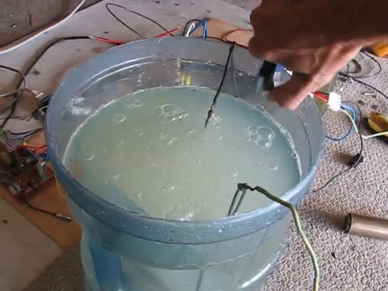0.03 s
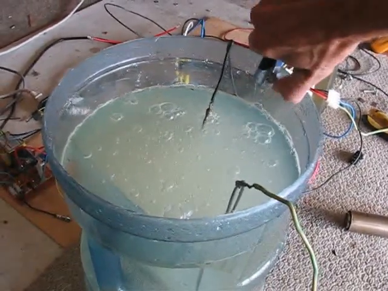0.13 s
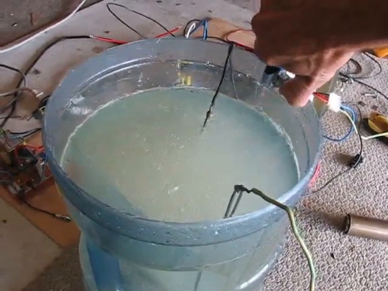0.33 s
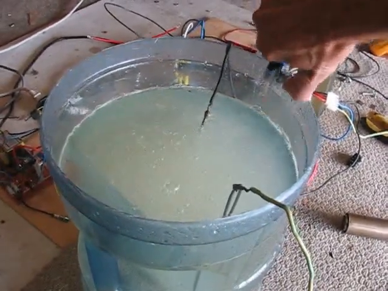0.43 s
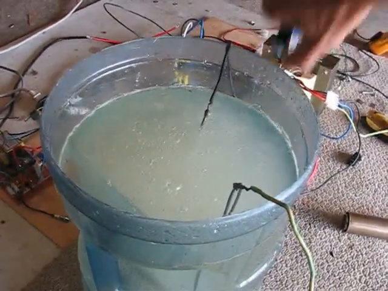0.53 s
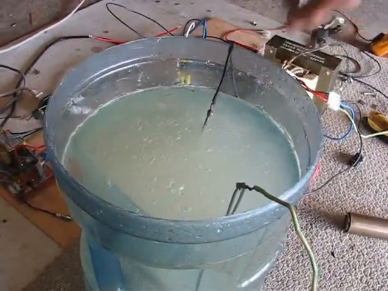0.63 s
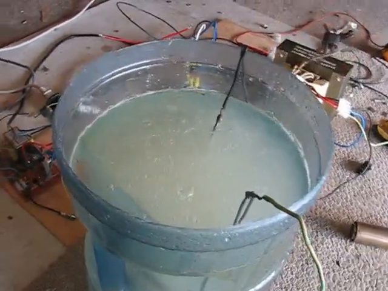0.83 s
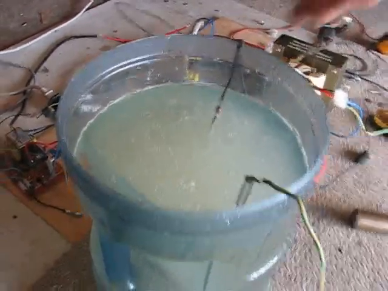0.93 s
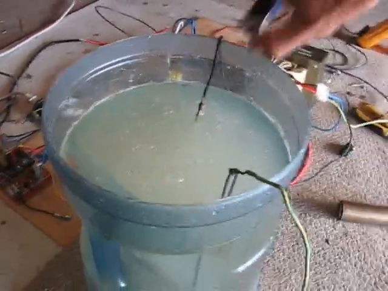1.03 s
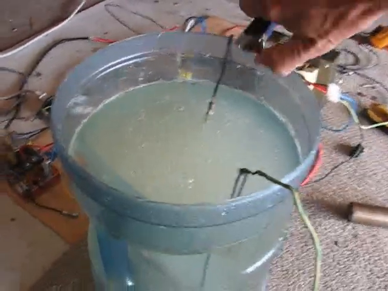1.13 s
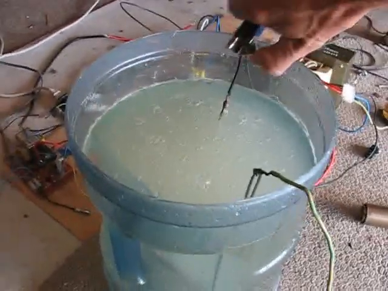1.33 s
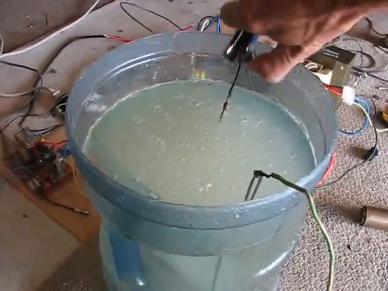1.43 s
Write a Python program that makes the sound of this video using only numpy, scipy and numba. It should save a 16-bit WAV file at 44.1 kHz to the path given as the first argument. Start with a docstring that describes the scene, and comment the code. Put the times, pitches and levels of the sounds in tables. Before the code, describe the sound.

Gas bubbles explode with a loud bang over a fizzing bucket, between sharp igniter clicks.

```python
"""Water fizzes in a bucket over a low hum, and a hand-held spark igniter clicks above it.
One gas bubble cracks, then the whole raft of bubbles explodes with a bang that sets the air in the
bucket ringing and fills the room. Two more clicks follow as tiny bubbles keep bursting.
The recorder turns itself down at every loud sound and creeps back up."""
import sys
import numpy as np
from scipy import signal
from scipy.fft import rfft, irfft
from scipy.io import wavfile
from numba import njit

SR = 44100
rng = np.random.default_rng(int(sys.argv[2]) if len(sys.argv) > 2 else 0)


def to_wav(s):
    """Save 16-bit WAV."""
    ch = np.atleast_2d(s).T  # columns
    pcm = np.round(np.clip(ch, -1, 1) * 32767)  # PCM
    wavfile.write(sys.argv[1], SR, pcm.astype(np.int16))


N = 66150
T = np.arange(N) / SR

# Levels are relative. Pan above 0 is to the left. Likeness 1 means left and right are the same.
# the raft's chain of explosions: t/s, level/dB, length of the push/s, pan/dB
BLASTS = [(.3210, -2, 0.00049, 18), (0.3237, -10, .0004, -28.5), (0.3237, -21, 0.00026, 13),
          (0.3262, -9.5, .0005, -23), (0.3308, -3.5, 0.00015, -4), (.3340, -2, 0.00026, -10),
          (0.339, -2, 0.0005, -3)]
# tones of the air in the bucket: f/Hz, level/dB, fade/s (a fade is the time to drop 60 dB)
BUCKET_TONES = [(435.6, -4, 0.43), (508, 5.5, 0.33), (608, -19, 0.25), (960, -4.5, 0.56), (980, 4, 0.44),
                (1056, -5, 0.38), (1067, -2.5, 0.47), (1148, -12, 0.27), (1290, -1, 0.32), (1507, -1, 0.41),
                (1581, -0.5, 0.46), (1897, -4, 0.45), (2358, -16.5, 0.75), (2885, -3.5, 0.48)]
# noise of the bang: f/Hz, level/dB
BANG_COLOUR = [(40, -32), (150, -8), (300, 0), (370, -2), (470, 1.5), (700, 3), (1000, 2), (1600, 1.5),
               (2300, -1), (2850, -1.5), (3600, -6), (4500, -15.5), (6000, -6), (9000, -19)]
# tones of the first bubble's crack: f/Hz, level/dB, fade/s
CRACK_TONES = [(1567, -12, .008), (2331, -12, .01), (3000, -9, .011), (3472, -2, .018), (4005, 0, .02),
               (4511, -6, .015), (6200, -9, .012), (7500, -9, .011), (8600, -10, .008)]
# echo of the crack: f/Hz, level/dB
CRACK_ECHO_COLOUR = [(100, -15), (300, -7.5), (600, -5.5), (2000, -4), (3600, 4.5), (5000, -11.5),
                     (6300, 0), (9000, -5)]
# igniter clicks: t/s, level/dB, length/s, brightness/(dB per octave), pan/dB, echo/dB
CLICKS = [(0.214, 13, .0016, 10, -6, -6), (0.2586, -2, .0003, 0, 1, -12), (0.5937, -3, .0015, 34.5, -6, -4),
          (1.2123, 7, .0011, 17.5, 18, -2)]
# hammer hits within a click: delay/click length, level/dB
HAMMER_HITS = [(0, -13), (0.552, -9), (0.998, -1)]
# tones of the igniter's body: f/Hz, level/dB
IGNITER_TONES = [(1400, -35), (2450, -4), (3900, -62), (4600, 3), (4950, 0.5), (5600, -4), (6400, -7),
                 (8000, -14), (8650, -21.5)]
# rattle of the igniter's parts: f/Hz, level/dB
RATTLE_COLOUR = [(200, -31), (1200, -12.5), (2400, -3), (3500, -10), (4700, 6), (6000, -3.5), (8500, 1.5)]
# echo of the clicks: f/Hz, level/dB
CLICK_ECHO_COLOUR = [(100, -36), (1300, -43), (2300, -3), (3500, -4.5), (5000, 5.5), (6500, -3.5),
                     (9000, -2.5)]
# tiny bursting bubbles: f/Hz, level/dB
FIZZ_COLOUR = [(1500, -16), (3000, -5), (3800, -1), (4500, 1.5), (5400, -0.5), (6200, 0), (7700, 1.5),
               (9000, -7.5)]
# slow swells: t/s, fizz and ping level/dB, air level/dB
SWELLS = [(0, 0.5, 2), (.2, 1, 0.5), (.6, 6, 2.5), (.8, 0, 3.5), (1.0, -1, -1.5), (1.2, 1, 0),
          (1.35, 0.5, -1), (1.45, 3.5, 2.5)]
# rush of air: f/Hz, level/dB
AIR_COLOUR = [(30, -3), (64, 4.5), (120, 3), (450, 4.5), (750, 1), (1400, 3.5), (2000, -3), (2400, -1),
              (2900, -8.5), (9000, -54)]
# stereo width of the rush: f/Hz, likeness
AIR_LIKENESS = [(150, 1), (600, 0.9), (1200, 0.85), (2000, .4), (3200, 0.11), (9000, .2)]
# tones of the hum: f/hum pitch, level/dB
HUM_TONES = [(1, -60), (2, -74.5), (3, -71), (4, -70.5)]
# rise and fall of the hum: t/s, level/dB
HUM_LEVEL = [(0, 1), (.2, 14), (.8, 12.5), (1.15, 21.5), (1.5, 21)]
# how long the room echoes: f/Hz, fade/s
ROOM_FADE = [(100, 0.46), (300, 0.36), (550, 0.37), (1200, 0.39), (3000, 0.4), (5000, 0.36), (9000, 0.29)]
# stereo width of the room: f/Hz, likeness
ROOM_LIKENESS = [(250, 1), (600, 0.94), (1200, 0.68), (2000, 0.33), (3200, 0.3), (5000, -0.08),
                 (7500, 0.019)]

BUCKET_BUILD_S, ROAR_DELAY_S, ROAR_LOW_HZ = 0.045, .004, 415
SURGE_HZ, SURGE_DB, SURGE_FADE_S = 30, -3, 0.18
CRACK_AT_S, IGNITER_FADE_S, ECHO_BUILD_S = .2804, .007, 0.0013
FIZZ_PER_S, FIZZ_LIKENESS, HUM_HZ = 4500, 0.43, 72
PINGS_PER_S, PING_SPREAD_DB, PING_CYCLES, PING_LOW_HZ, PING_HIGH_HZ = 200, 18, 65, 3970, 5400
MIC_LIMIT_DB, MIC_TOP_HZ, RECORDER_TOP_HZ = 19, 8745, 10207
DUCK_ATTACK_S, DUCK_RELEASE_S, DUCK_AIM_DB = 0.00045, 0.17, -1.5


def bang():
    """A chain of shocks pushes the air; the bucket's ring and the room's roar swell up behind it."""
    start = BLASTS[0][0]
    shocks = sum(placed(-from_db(22 + db) * shock(s, length), pan) for s, db, length, pan in BLASTS)
    early_echoes = from_db(16.5) * burst(BANG_COLOUR, BLASTS, fade_s=0.019)
    bucket = from_db(9.5) * ring(BUCKET_TONES, start) * build_up(T - start, BUCKET_BUILD_S)
    surge = ring([(SURGE_HZ, SURGE_DB, SURGE_FADE_S)], start)  # slow push of the expanding gas
    roar = from_db(53.5) * room(impulse(start + ROAR_DELAY_S), BANG_COLOUR, build_s=0.032)
    # the bucket gives off little below its lowest tone
    bass_cut = signal.cheby1(6, .5, ROAR_LOW_HZ, "high", fs=SR, output="sos")
    roar = signal.sosfilt(bass_cut, roar) + from_db(-15.5) * roar
    return shocks + early_echoes + placed(bucket + surge) + roar


def first_bubble():
    """One bubble cracks: a small shock with a short, bright ring, and its echo."""
    pulse = from_db(5.5) * shock(CRACK_AT_S, length_s=0.00031)
    crack = cut_lows(from_db(24) * (ring(CRACK_TONES, CRACK_AT_S) - pulse), hz=253, order=2)
    return placed(crack) + from_db(35.5) * room(impulse(CRACK_AT_S), CRACK_ECHO_COLOUR, ECHO_BUILD_S)


def igniter():
    """Each click is three quick hits of the spring hammer, a brief rattle and an echo."""
    tones = [(hz, db, IGNITER_FADE_S) for hz, db in IGNITER_TONES]
    direct, to_room = 0, 0
    for s, db, length, tilt_db, pan_db, echo_db in CLICKS:
        click = sum(from_db(hit_db) * ring(tones, s + share * length, tilt_db)
                    for share, hit_db in HAMMER_HITS)
        direct += from_db(db) * placed(cut_lows(click, hz=1560, order=4), pan_db)
        to_room += from_db(db + echo_db) * impulse(s)
    rattle = from_db(-1.5) * burst(RATTLE_COLOUR, CLICKS, fade_s=0.029)
    return direct + rattle + from_db(15.5) * room(to_room, CLICK_ECHO_COLOUR, ECHO_BUILD_S)


def fizz():
    """Thousands of tiny bubbles burst at the surface every second."""
    sizes = from_db(np.minimum(rng.exponential(1, (2, N)), 5)) * rng.choice([-1, 1], (2, N))
    pops = sizes * (rng.random((2, N)) < FIZZ_PER_S / SR)
    hz = np.arange(N // 2 + 1) * SR / N + 1
    mid, side = irfft(rfft(pops) * from_db(at_hz(FIZZ_COLOUR, hz)), N)
    return at_level(stereo(mid, side, FIZZ_LIKENESS), db=-38)


def pings():
    """Larger bubbles ring briefly as they burst, each at its own pitch and place."""
    out, age = np.zeros((2, N + SR)), T[:SR // 25]
    draws = rng.random((600, 4))
    times = np.cumsum(-np.log(1 - draws[:, 0])) / PINGS_PER_S
    for s, (_, pitch, size, place) in zip(times[times < T[-1]], draws):
        hz = PING_LOW_HZ * (PING_HIGH_HZ / PING_LOW_HZ) ** pitch
        level = from_db(PING_SPREAD_DB * size - 60 * age * hz / PING_CYCLES)
        ping = level * np.sin(2 * np.pi * hz * age)
        start = int(s * SR)
        out[:, start:start + len(age)] += np.outer(np.sqrt([place, 1 - place]), ping)
    return at_level(out[:, :N], db=-44)


def air_and_hum():
    """A soft rush of air and a low hum, as from a small fan."""
    air = at_level(noise(AIR_COLOUR, AIR_LIKENESS), db=-37.5)
    hum = sum(from_db(db) * np.sin(2 * np.pi * (k * HUM_HZ * T + rng.random())) for k, db in HUM_TONES)
    return swell(SWELLS, column=2) * air + swell(HUM_LEVEL) * hum


def room(x, colour, build_s):
    """Echoes from the walls thicken, then die away, each pitch range at its own speed."""
    tail = sum(band * from_db(-60 * T / at_hz(ROOM_FADE, hz))
               for hz, band in noise_bands(colour, ROOM_LIKENESS))
    tail *= build_up(T, build_s)
    tail /= np.sqrt(np.mean(np.sum(tail ** 2, axis=1)))
    return signal.fftconvolve(x[None], tail, axes=1)[:, :N]


def ring(tones, s, tilt_db=0):
    """Fading tones struck at time s, made brighter by tilt_db per octave."""
    age, centre_hz = np.maximum(T - s, 0), np.mean([tone[0] for tone in tones])
    out = 0
    for hz, db, fade_s in tones:
        level_db = db + tilt_db * np.log2(hz / centre_hz) - np.minimum(60 * age / fade_s, 300)
        out += from_db(level_db) * np.sin(2 * np.pi * hz * age)
    return out


def shock(s, length_s):
    """A sudden push of air, followed by a weaker pull."""
    age = np.clip((T - s) / length_s, 0, 100)
    return (T >= s) * (1 - age) * np.exp(-age)


def burst(colour, hits, fade_s):
    """Noise that jumps up at each hit and dies quickly."""
    level = sum((T >= s) * from_db(db - np.minimum(60 * np.abs(T - s) / fade_s, 300))
                for s, db, *_ in hits)
    return level * at_level(noise(colour, ROOM_LIKENESS), db=0)


def noise(colour, likeness):
    """Steady stereo noise; its colour says how strong each pitch is."""
    return sum(band for _, band in noise_bands(colour, likeness))


def noise_bands(colour, likeness):
    """Stereo noise in slices a third of an octave wide, as (Hz, slice)."""
    edges, white = 25 * 2 ** (np.arange(27) / 3), rng.standard_normal((2, 2, N + 8000))
    for k, (low, high) in enumerate(zip(edges, edges[1:])):
        band_pass = signal.butter(2, [low, high], "band", fs=SR, output="sos")
        mid, side = signal.sosfilt(band_pass, white[k % 2])[:, -N:]
        hz = np.sqrt(low * high)
        yield hz, from_db(at_hz(colour, hz)) * stereo(mid, side, at_hz(likeness, hz))


def stereo(mid, side, likeness):
    """Left and right share mid and get side with opposite signs."""
    return np.sqrt(1 + likeness) * mid + np.sqrt(1 - likeness) * np.array([side, -side])


def placed(x, pan_db=0, left_lag_s=.00003):
    """Direct sound, reaching the right side just before the left."""
    hz = np.arange(N + 1) * SR / (2 * N)
    left = irfft(rfft(x, 2 * N) * np.exp(-2j * np.pi * left_lag_s * hz))[:N]
    return np.array([left * from_db(pan_db / 2), x * from_db(-pan_db / 2)])


def cut_lows(x, hz, order):
    """Weaken everything below hz."""
    return signal.sosfilt(signal.butter(order, hz, "high", fs=SR, output="sos"), x + 1e-18)


def build_up(age, build_s):
    """A smooth rise from 0 to 1."""
    return 1 - np.exp(-(age / build_s) ** 2)


def impulse(s):
    """A one-sample tick at time s."""
    return signal.unit_impulse(N, int(s * SR))


def swell(table, column=1):
    """Volume over time from a table's dB column."""
    columns = np.transpose(table)
    return from_db(np.interp(T, columns[0], columns[column]))


def at_hz(table, hz):
    """Read between a table's rows, with octaves evenly spaced."""
    pitches, values = np.transpose(table)
    return np.interp(np.log(hz), np.log(pitches), values)


def at_level(x, db):
    """Set the average (rms) level."""
    return from_db(db) * x / np.sqrt(np.mean(x ** 2) + 1e-20)


def from_db(db):
    """Turn decibels into a multiplier."""
    return 10 ** (np.asarray(db) / 20)


def scene():
    """Clicks, crack and bang over the fizzing bucket."""
    return igniter() + first_bubble() + bang() + swell(SWELLS) * (fizz() + pings()) + air_and_hum()


@njit
def follow(level, attack, release, rush):
    """Track loudness: rise fast, sink slowly; rush speeds the sinking from high levels."""
    out, held = np.zeros(len(level)), 0.
    for i in range(len(level)):
        rate = attack if level[i] > held else release * (1 + rush * held)
        held += (level[i] - held) * rate
        out[i] = held
    return out


def record(dry):
    """The microphone overloads and loses treble; the volume ducks too late, so the first peaks clip."""
    limit = from_db(MIC_LIMIT_DB)
    overloaded = limit * np.tanh(dry / limit)
    mic = signal.sosfilt(signal.cheby1(10, .3, MIC_TOP_HZ, fs=SR, output="sos"), overloaded)
    held = follow(np.abs(mic).max(axis=0), 1 / (DUCK_ATTACK_S * SR), 1 / (DUCK_RELEASE_S * SR), 0.013)
    ducked = np.clip(mic / (1 + held / from_db(DUCK_AIM_DB)), -1, 1)
    return signal.sosfilt(signal.ellip(6, .2, 30, RECORDER_TOP_HZ, fs=SR, output="sos"), ducked)


dry = scene()
out = record(dry)
to_wav(out)
```